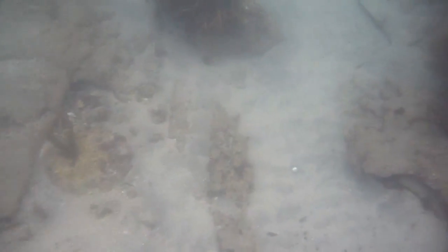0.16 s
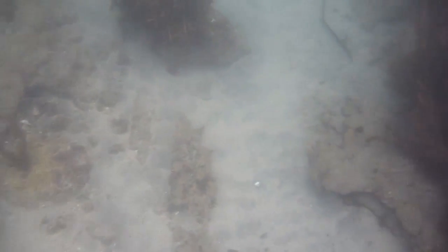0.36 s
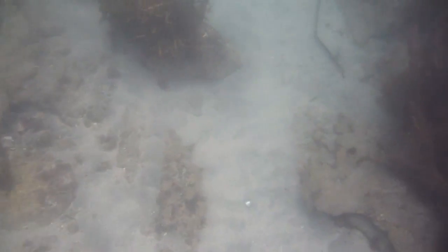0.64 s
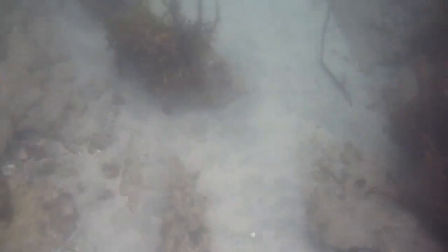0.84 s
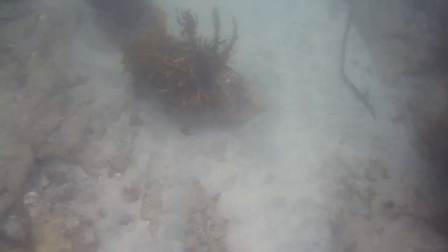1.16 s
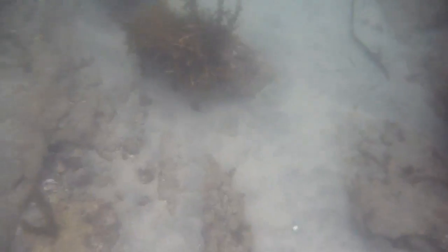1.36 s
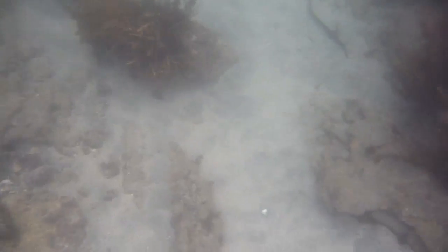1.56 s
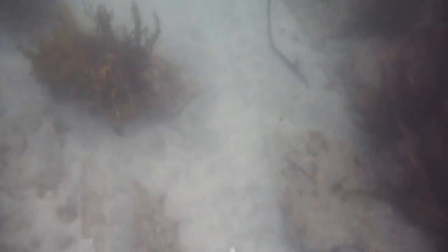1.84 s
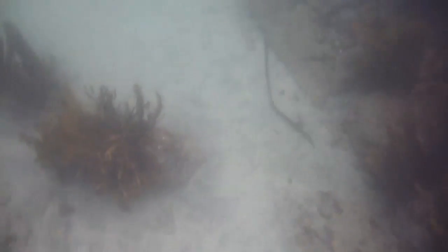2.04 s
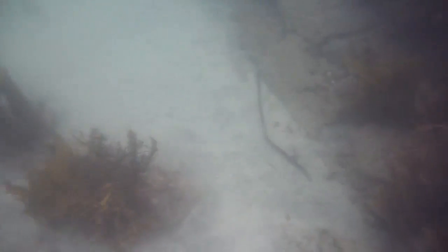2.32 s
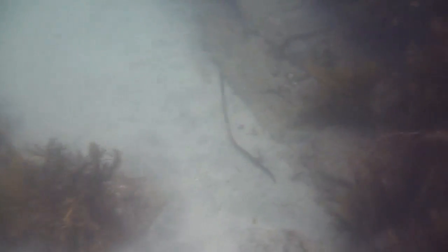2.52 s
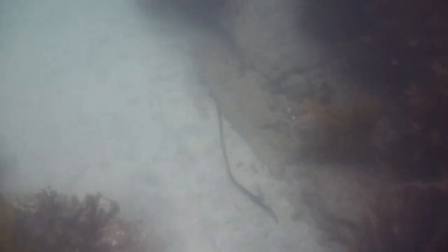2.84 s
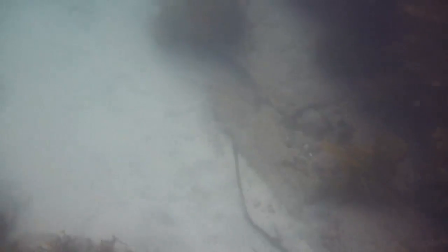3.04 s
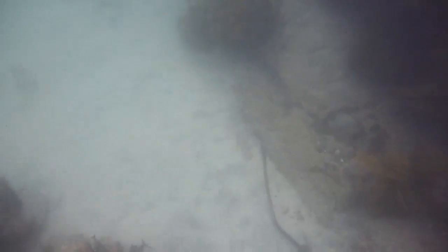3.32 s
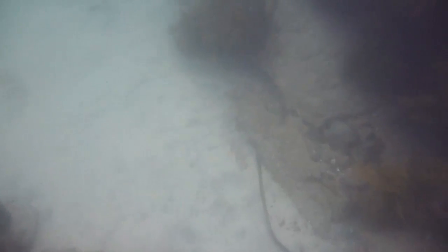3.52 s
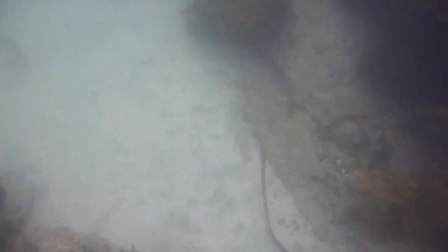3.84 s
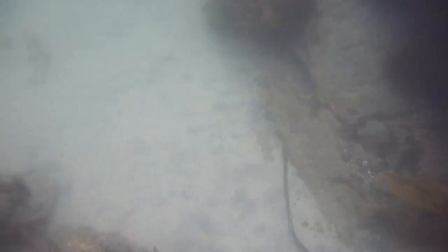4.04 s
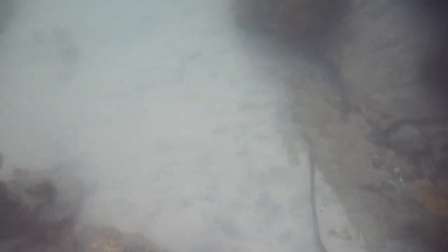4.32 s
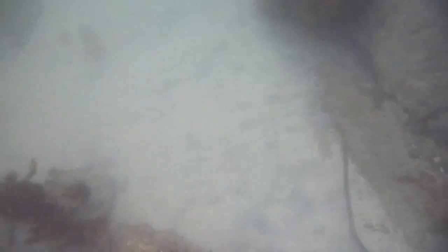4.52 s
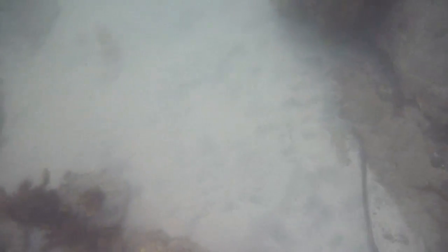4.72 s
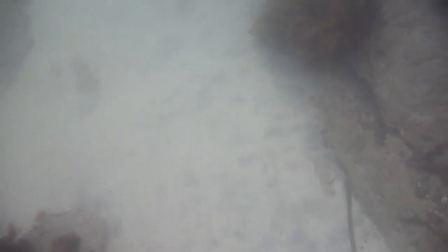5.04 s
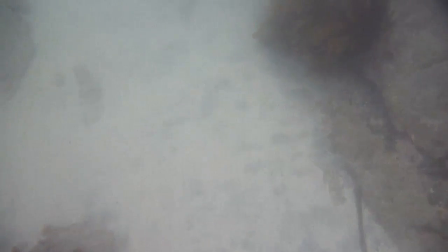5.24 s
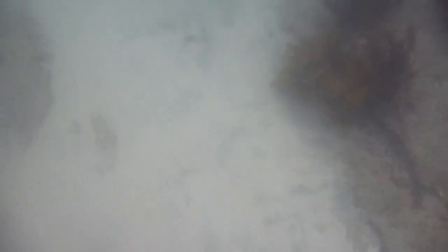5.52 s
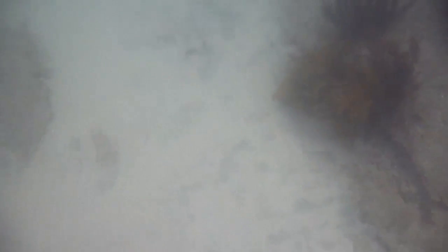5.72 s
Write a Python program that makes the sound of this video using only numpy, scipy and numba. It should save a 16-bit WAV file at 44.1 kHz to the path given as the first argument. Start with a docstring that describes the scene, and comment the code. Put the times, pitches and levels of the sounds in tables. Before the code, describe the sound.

Boxy, close underwater sound with little deep bass. Surf overhead pushes bubbles along in hollow mid-low blubs, over a restless soft rush. Shrimp snap all the time, some sharp and near, most a faint distant sizzle. One strong bloop comes at 1.6 seconds, a cluster of gurgles follows, then a short scrape on the case around 2.5. Later the bubbling continues in small plops with busier, harder clicks to the end.

```python
"""A shallow reef, heard by a camera in a sealed case.
Surf overhead drives bubbles: banded noise for the rush, gliding sine pairs for the gurgles.
Shrimp snap near (impulses ringing the case) and far (hiss and crackle); a knock and a scrape, filtered
sine and noise, sound on the case. Notches and wandering peaks of wall and air pocket colour all of these.
The electronics whine in bursts of steady sines, uncoloured by the case."""
import sys
import numpy as np
from scipy import signal
from scipy.io import wavfile
from scipy.ndimage import uniform_filter1d
from numba import njit

SR = 44100
rng = np.random.default_rng(int(sys.argv[2]) if len(sys.argv) > 2 else 0)


def int16_out(signal):
    """Quantize to a 16-bit WAV file."""
    q = np.round(np.clip(np.atleast_2d(signal).T, -1, 1) * 32767)
    wavfile.write(sys.argv[1], SR, q.astype(np.int16))


N = 259308
T = np.arange(N) / SR


def undb(db):
    """Amplitude ratio of a level in dB."""
    return 10 ** (np.asarray(db) / 20)


def level(x, db):
    """Scale x to an rms of db."""
    return x * undb(db) / np.sqrt(np.mean(x ** 2))


@njit
def svf(x, centre_hz, width_hz):
    """State-variable band-pass with a moving centre, gain 1 there."""
    y, band_state, low_state = np.empty(len(x)), 0., 0.
    for i in range(len(x)):
        g = np.tan(np.pi * centre_hz[i] / SR)
        k = width_hz / centre_hz[i]
        v = (band_state + g * (x[i] + 1e-18 - low_state)) / (1 + g * (g + k))
        band_state = 2 * v - band_state
        low_state += 2 * g * v
        y[i] = k * v
    return y


def band(x, hz, width_hz, passes=1):
    """Fixed second-order band-pass, gain 1 at the centre, run once or more."""
    b, a = signal.iirpeak(hz, hz / width_hz, SR)
    for _ in range(passes):
        x = signal.lfilter(b, a, x)
    return x


def shape(table, hz):
    """dB of a (Hz, dB) table, linear over log frequency."""
    table_hz, db = np.transpose(table)
    return np.interp(np.log(hz), np.log(table_hz), db)


def walk(rate_hz):
    """Random levels held 1 / rate_hz s and slewed twice; spread near 1."""
    hold = int(SR / rate_hz)
    steps = np.repeat(rng.standard_normal(N // hold + 1), hold)
    return 1.3 * uniform_filter1d(uniform_filter1d(steps, hold), hold)[:N]


def add(out, s, x):
    """Mix x into out from time s."""
    i = int(s * SR)
    out[i:i + len(x)] += x[:N - i]


# Surf overhead. Each row: time in seconds, relative level in dB of the flow rumble, of the big bubbles,
# of the middling bubbles.
SURF_LEVELS = [(0.0, -51, -31.5, -36), (0.18, -54.5, -30.5, -42.5), (0.4, -56, -32, -38.5),
               (0.65, -47.5, -38.5, -41), (0.85, -54, -43.5, -42), (1.08, -56.5, -48.5, -42.5),
               (1.28, -50.5, -35.5, -38.5), (1.55, -62, -24, -41), (1.75, -64, -28.5, -40),
               (1.9, -56.5, -29, -35), (2.15, -51.5, -34.5, -36.5), (2.42, -55, -31, -37.5),
               (2.46, -55, -35.5, -39.5), (2.55, -58, -33.5, -37), (2.66, -69, -36.5, -39),
               (2.8, -53.5, -33, -40), (3.0, -58.5, -35, -40.5), (3.33, -58.5, -38, -40.5),
               (3.45, -51.5, -37.5, -35), (3.7, -54.5, -33.5, -31), (4.1, -60.5, -30.5, -37.5),
               (4.45, -62, -31.5, -32.5), (4.75, -57.5, -29, -42), (4.95, -55.5, -36, -37),
               (5.2, -51.5, -29.5, -32.5), (5.55, -59.5, -33, -39.5), (5.88, -49, -30.5, -43)]
# Other bubble sizes. Each row: time in seconds, relative level in dB of the largest, of the small,
# of the smallest.
SIZE_LEVELS = [(0.02, -44.5, -53, -56), (0.25, -42.5, -46, -54), (0.8, -62.5, -47.5, -60),
               (1.12, -57.5, -45.5, -57.5), (1.51, -49.5, -47.5, -54), (1.79, -61, -48.5, -55),
               (2.22, -48, -47, -49), (2.58, -57, -50.5, -54), (3.0, -50, -49.5, -52.5),
               (3.36, -49.5, -48, -53.5), (3.57, -45.5, -44.5, -47.5), (3.75, -47.5, -43.5, -47),
               (4.09, -44.5, -48.5, -50.5), (4.4, -52.5, -43, -52.5), (5.03, -53, -43.5, -50.5),
               (5.22, -49.5, -45, -48), (5.66, -52.5, -51, -51.5), (5.84, -52.5, -51, -52.5)]


def surf(s):
    """Surf drive at times s: relative dB of the rumble, then of five bubble sizes, largest first."""
    surf_s, *surf_db = np.transpose(SURF_LEVELS)
    size_s, *size_db = np.transpose(SIZE_LEVELS)
    rumble, big, middling = [np.interp(s, surf_s, db) for db in surf_db]
    largest, small, smallest = [np.interp(s, size_s, db) for db in size_db]
    return np.array([rumble, largest, big, middling, small, smallest])


# Pitches of the surf levels: top of the rumble in Hz, then centres in Hz of five bubble sizes, largest first.
SURF_HZ = (260, 340, 480, 760, 960, 1250)
# Ripple about the surf levels. Each row: pitch in Hz, offset in dB.
RIPPLE = [(60, -37), (110, -16.5), (200, -1.5), (270, 3), (320, -3), (390, 5), (450, 1.5), (580, 1.5),
          (640, -4), (780, 6.5), (950, 5), (1100, 5), (1280, 5), (1480, 0.5), (1700, -7.5)]
RUSH_DB = -8  # unresolved rush against the rippled surf level


def rush(flicker_db=2.0, swell_db=2.0, shared_db=1.5, drift_db=1.0):
    """Unresolved bubbles: sixth-octave noise slices, each flickering and swelling alone, throbbing together."""
    levels_db = surf(T) + drift_db * np.array([walk(5.11) for _ in SURF_HZ])
    out, throb = 0, walk(30)
    for hz in 60 * 2 ** np.arange(0, 5, 1 / 6):
        weights = [np.interp(np.log(hz), np.log(SURF_HZ), one) for one in np.eye(len(SURF_HZ))]
        db = weights @ levels_db + shape(RIPPLE, hz)
        db = db + flicker_db * walk(24) + swell_db * walk(9) + shared_db * throb
        noise = band(rng.standard_normal(N), hz, hz / 5, passes=3)
        out = out + undb(db) * level(noise, 0)
    return out * undb(RUSH_DB)


# Far hiss. Each row: frequency in Hz, relative density in dB per Hz.
HISS = [(1500, 5.5), (2000, 5.5), (3000, 0), (4500, -1.5), (6400, -7), (8500, -13.5), (10500, -16.5),
        (12500, -15), (14500, -28)]
# Colours of the far ticks. Each row: centre in Hz, width in Hz, relative level in dB.
CRACKLE_BANDS = [(2200, 1700, -1), (3920, 2400, 4), (6260, 2300, -3.5), (9170, 2200, -2.5),
                 (12200, 3000, -19)]
HISS_DB, CRACKLE_DB = -57.5, -67  # rms before case and microphone


def sea(ticks_per_s=220.0, spread_db=5.5, tail_s=0.0026, drift_db=0.26, flicker_db=2.0):
    """Smooth far hiss plus the crackle of distant shrimp: smeared ticks, each with a colour of its own."""
    hiss = 0
    for hz in 1500 * 2 ** np.arange(0, 3.3, 1 / 3):
        db = shape(HISS, hz) + drift_db * walk(5) + flicker_db * walk(30)
        hiss = hiss + undb(db) * band(rng.standard_normal(N), hz, hz / 3, passes=2)
    chance = rng.random((N, 2 + len(CRACKLE_BANDS))).T
    tick_db = -spread_db * np.log(1 - .95 * chance[1])
    ticks = (chance[0] < ticks_per_s / SR) * undb(tick_db)
    crackle, tail_t = 0, T[:SR // 100]
    for (hz, width_hz, db), share in zip(CRACKLE_BANDS, chance[2:]):
        tail = np.exp(-tail_t / tail_s) * rng.standard_normal(len(tail_t))
        smeared = signal.fftconvolve(ticks * share ** 3, tail)[:N]
        crackle = crackle + level(band(smeared, hz, width_hz, passes=2), db)
    return level(hiss, HISS_DB) + level(crackle, CRACKLE_DB)


# Near shrimp. Each row: start in seconds, peak in dB on the second ring of the case before its trim,
# dB of the low, third, fourth and top ring against it.
SNAP_ROWS = [(0.0075, -34, -10, -9, -26.0, -38), (0.0425, -69, 8.0, -5, 4.0, 2.0),
             (0.061, -66, 1, -6.0, 5, -14.0), (0.083, -54, -8.0, -14.0, 9, -11.0),
             (0.1447, -23, -16, -26, -14, -29.0), (0.148, -29.5, -11, -8, -11, -24),
             (0.173, -40, -2.5, -7, 2, -16.0), (0.179, -38, -16, -16, -18, -28),
             (0.3517, -47, -18, -15.0, 6, -17.0), (0.589, -44, -3.0, -12.0, -12.0, -12.0),
             (0.6146, -41, 2, -11.0, -7, -13.0), (0.6164, -50, 9, -17.0, -7.0, -22.0),
             (0.6448, -49, -10.0, -4.0, -10.0, -24.0), (0.6499, -50.0, -6.0, -9.0, -8.0, -11.0),
             (0.763, -44, -19.0, -7.0, 0, -14.0), (0.8003, -60, -3.0, 3.0, 12, -5.0),
             (0.823, -39, -11, -27.0, -13.0, -31.0), (0.8439, -43, -5, -6.0, -15.0, -20.0),
             (1.021, -54, 0, 0.0, 9, -4.0), (1.0696, -44, -16, -16, -18, -28),
             (1.0845, -55, -11.0, -7.0, -4.0, -4.0), (1.1181, -59, -8.0, -1.0, 0, -3.0),
             (1.1396, -63, 9.0, -8.0, 1, -16.0), (1.26, -65, -1.0, 3.0, 1.0, 2.0),
             (1.2645, -63, 0.0, -12.0, 3, -4.0), (1.3494, -42, -12, -15, -14, -28),
             (1.3824, -28, -25.0, -11, -30, -30.0), (1.481, -50, -17.0, -19.0, -12.0, -13.0),
             (1.5038, -40.5, -14.0, -20.0, -12, -35.0), (1.5741, -42.0, -22.0, -5.0, -2.0, -4),
             (1.5941, -37.5, -3.5, -24.0, -16.0, -23.0), (1.6672, -53, -10, -9.0, -3.0, -6.0),
             (1.6786, -44, -0.5, -9, 2, -18.0), (1.7287, -32.5, -27, -22, -17, -29.0),
             (1.7846, -29, -12, -16, -31, -35.0), (1.8098, -27.5, -5, -9, -31, -38.0),
             (1.8135, -31, -4, -19, -27, -38.0), (1.8752, -60, 14, -7.0, 18.0, -8),
             (1.9524, -39.5, -5, -1, -3, -23.0), (1.9638, -63.0, 0.0, -1.0, 14.0, -9.0),
             (1.9747, -52, -8.0, -12, -2.0, -22.0), (2.0095, -54, -11.0, -9.0, 1.0, -18.0),
             (2.2345, -49, -10.0, -11.0, -7.0, -8.0), (2.283, -45, -13.0, 0, -2, -21.0),
             (2.3093, -42, -14, -17, -14, -28), (2.4121, -47, -14.0, -13.0, -1, -21.0),
             (2.422, -41.5, -5, -7.0, -10.0, -15.0), (2.487, -65, 0.0, -6.0, 9, -3.0),
             (2.6003, -41.5, -11.0, -15.0, 4, -13.0), (2.6647, -53, -1.0, -8.0, 3, -12.0),
             (2.711, -39, -12, -12, -9.0, -13.0), (2.7377, -49.0, -9.0, -6.0, -6.0, -7.0),
             (2.8046, -43.5, -9.0, 3, 4, -10.0), (2.929, -39.5, -18.0, -8, -1.5, -22.0),
             (3.007, -35.5, -24.0, -21.0, -16, -30.0), (3.032, -56.5, -6.0, -2.0, 10, -8.0),
             (3.0814, -59, -1.0, 6.0, 9.0, 4.0), (3.24, -43, -8, -1.0, -4, -7.0),
             (3.2798, -48, -15.0, -9.0, -5.0, -7.0), (3.4153, -57, 7, 3.0, 9, -18),
             (3.5095, -36, -17, -14.0, -23.0, -43.0), (3.5224, -36, -19, -8, -1.5, -29.0),
             (3.8137, -39, -20.0, -13.0, -13.0, -27.0), (3.8212, -52, -10, -4, 12.5, -19.0),
             (3.8304, -51, -16, -10.0, -4.0, -8.0), (3.9698, -50, 9, 3, -7, -7.0),
             (4.026, -23, -10, -21, -12.5, -42.0), (4.0696, -55, 5.0, -8.0, 9, -7.0),
             (4.138, -28.5, -2.5, -25, 1, -23), (4.1647, -37, -17.0, -20.0, -16.0, -40.0),
             (4.1916, -37, -1.5, -2, -5, -17.0), (4.292, -36.5, -10, -9, -19.0, -34.0),
             (4.3137, -54, -4.0, -1.0, -1.0, -3.0), (4.328, -38, -13, -11.0, -17, -17.0),
             (4.3331, -50, -7.0, -12.0, -2.0, -3.0), (4.3522, -44, -12.0, -4.0, -4, -12.0),
             (4.435, -35.5, -8, -15.0, -10, -35.0), (4.503, -35.5, -9.0, -5, -2.5, -13),
             (4.51, -37, -11, -9, -19.0, -27.0), (4.6014, -44, -4.0, -7, -1, -7.0),
             (4.6513, -31, -16.0, -15, 1, 1.5), (4.658, -24, -6.5, -20.0, -17, -36.0),
             (4.6774, -33, -19, -15.0, -3, -16.0), (4.683, -34, -22, -12, -11, -26),
             (4.848, -31.5, -14, -12, -14, -20), (4.8635, -36.5, -5, -25.0, -23.0, -31.0),
             (4.8906, -21.5, -22, -14, -33, -23), (4.9424, -49, 2, -3.0, -6, -5.0),
             (4.9486, -41, -11.0, -2, -12, -19.0), (5.0405, -60, -1.0, -6.0, 13, -11.0),
             (5.0684, -37, 0, -19.0, -23.0, -28), (5.0925, -40.5, -16.0, -4, -15.0, -17.0),
             (5.125, -47.5, 2, 5, 6, -6.0), (5.1521, -54.0, -7.0, -5.0, -2.0, -2.0),
             (5.2206, -39, -22.0, 1, -14, -7), (5.2665, -44, -13, -5.0, -8.0, -22.0),
             (5.3183, -33.5, -21.0, -13.0, -24.0, -31.0), (5.3318, -46, 5, -4.0, -3, -16.0),
             (5.3699, -55.5, -6.0, -13.0, -6.0, -5.0), (5.3813, -62.5, 1.0, -2.0, 7.0, 7.0),
             (5.3922, -51, -6.0, -14.0, -5.0, -5.0), (5.4077, -46, -15.0, -18, -6.0, -8.0),
             (5.4262, -38, -23.0, -19.0, -17.0, -29.0), (5.501, -43, -11, -5, -8, -22),
             (5.5453, -26.5, -9, -21, -14, -30.0), (5.5831, -51.0, -11.0, -6.0, -4.0, -7.0),
             (5.667, -55, -6.0, -11.0, 12, -8.0), (5.7916, -50.5, -14.0, -9.0, -6.0, -8.0),
             (5.8494, -50.5, 6, -2, 7, -17.0)]
# Rings of the case, lowest first. Each row: pitch in Hz, width in Hz of each of two passes, trim in dB.
CASE_RINGS = [(1990, 1570, 5), (3940, 1030, -2), (6520, 3000, 0.5), (9340, 1600, -5), (11500, 2500, 0)]
# Fainter snaps: mean peak in dB on each ring, lowest first, before its trim.
FAINT_DB = (-59, -52.5, -62, -64, -81)
FAINT_COUNT, FAINT_SCATTER_DB = 80, 7.5  # random times; widest scatter from ring to ring
RATTLE_S, RATTLE_LOG_SCATTER = 0.0014, .3  # typical fade
RING_LOG_SCATTER = .035  # pitch spread from snap to snap
THUMP_HZ, THUMP_DB = 1140, 2.5  # under the low ring; dB against its untrimmed peak


def snaps(rattle=0.079, echo=0.028, echo_s=0.0078):
    """A tick, a short noisy rattle and a faint noisy echo off the rocks set off the rings of the case."""
    out, t = np.zeros(N), T[:SR // 25]
    near = [(s, db + low, db, db + third, db + fourth, db + top)
            for s, db, low, third, fourth, top in SNAP_ROWS]
    chance = rng.random((FAINT_COUNT, 1 + len(CASE_RINGS)))
    faint_db = FAINT_DB + FAINT_SCATTER_DB * (2 * chance[:, 1:] - 1)
    rows = np.vstack([np.c_[chance[:, 0] * N / SR, faint_db], near])
    for (s, *ring_peaks_db), noise in zip(rows, rng.standard_normal((len(rows), len(t)))):
        rattle_s = np.clip(RATTLE_S * np.exp(RATTLE_LOG_SCATTER * noise[0]), .0002, .015)
        blow = noise * (rattle * np.exp(-t / rattle_s) + echo * np.exp(-t / echo_s))
        blow[0] = 1  # the tick
        for k, ((hz, width_hz, trim_db), db) in enumerate(zip(CASE_RINGS, ring_peaks_db)):
            hz = hz * np.exp(RING_LOG_SCATTER * noise[-1 - k])
            ring = band(blow, hz, width_hz, passes=2)
            # neighbouring rings swing in opposite sense, so the crack stays even between them
            add(out, s, (-1) ** k * undb(db + trim_db) * ring / np.abs(ring).max())
        thump = band(blow, THUMP_HZ, THUMP_HZ, passes=2)
        add(out, s, -undb(ring_peaks_db[0] + THUMP_DB) * thump / np.abs(thump).max())
    return out


SWARM_COUNT, SWARM_LOW_HZ, SWARM_HIGH_HZ = 800, 340, 1400
SWARM_DB, SWARM_SPREAD_DB = 0.2, 2  # against the rippled surf level at their pitch
SWARM_CYCLES, SWARM_LOG_SPREAD = 3.4, 0.47  # typical length


def swarm():
    """Bubble rows of lesser bubbles at random times, following the surf level at their size and moment."""
    when, size = rng.random((SWARM_COUNT, 2)).T
    loud, long = rng.standard_normal((SWARM_COUNT, 2)).T
    s = .03 + when * (N / SR - .03)
    hz = SWARM_LOW_HZ * (SWARM_HIGH_HZ / SWARM_LOW_HZ) ** size
    surf_db = [np.interp(np.log(f), np.log(SURF_HZ), column) for f, column in zip(hz, surf(s).T)]
    db = SWARM_DB + SWARM_SPREAD_DB * loud + shape(RIPPLE, hz) + surf_db
    length_s = SWARM_CYCLES / hz * np.exp(SWARM_LOG_SPREAD * long)
    return list(zip(s, db, hz, length_s))


FLECK_COUNT, FLECK_LOW_HZ, FLECK_HIGH_HZ = 90, 1700, 2400
FLECK_DB, FLECK_SPREAD_DB, FLECK_S = -56.5, 3, 0.0033


def flecks():
    """Bubble rows of tiny high bubbles at random times; the lower ones are the more common."""
    when, size = rng.random((FLECK_COUNT, 2)).T
    db = FLECK_DB + FLECK_SPREAD_DB * rng.standard_normal(FLECK_COUNT)
    s = .03 + when * (N / SR - .03)
    hz = FLECK_LOW_HZ * (FLECK_HIGH_HZ / FLECK_LOW_HZ) ** (size ** 2)
    return [(*row, FLECK_S) for row in zip(s, db, hz)]


# Single bubbles at set times, loud gurgles to faint high blips, plus two short low bodies of snaps.
# Each row: middle in seconds, peak in dB before twin and wobble, pitch in Hz at the middle,
# length at half height in seconds.
BUBBLES = [(0.048, -27.5, 573, 0.018), (0.116, -24.5, 500, 0.016), (0.157, -22.5, 533, 0.0065),
           (0.448, -21, 530, 0.0061), (0.694, -29, 565, 0.009), (0.146, -34, 1250, 0.003),
           (0.198, -28, 502, 0.017), (0.249, -24.5, 954, 0.0092), (0.437, -22.5, 584, 0.0087),
           (0.411, -28, 520, 0.018), (0.552, -30, 860, 0.011), (0.635, -29.5, 764, 0.009),
           (0.724, -23.5, 578, 0.019), (1.015, -38, 226, 0.0094), (1.143, -46, 1840, 0.004),
           (1.296, -27.5, 615, 0.01), (1.42, -24.5, 446, 0.02), (1.468, -23, 450, 0.032),
           (1.471, -22, 755, 0.025), (1.532, -21, 463, 0.022), (1.572, -27, 550, 0.011),
           (1.626, -13.5, 523, 0.0057), (1.674, -26, 548, 0.01), (1.836, -18, 552, 0.014),
           (1.863, -15, 581, 0.025), (1.946, -23.5, 565, 0.042), (1.937, -28, 797, 0.02),
           (2.029, -20.5, 548, 0.015), (2.035, -30.5, 775, 0.03), (2.088, -27.5, 773, 0.024),
           (2.137, -23, 572, 0.0077), (2.15, -57, 2040, 0.0089), (2.192, -24.5, 430, 0.01),
           (2.154, -29, 834, 0.008), (2.173, -25, 800, 0.0089), (2.284, -33, 726, 0.01),
           (2.3, -48, 2090, 0.006), (2.332, -49, 2600, 0.004), (2.322, -16, 512, 0.01),
           (2.346, -21.5, 544, 0.0099), (2.345, -26, 810, 0.0077), (2.365, -31, 764, 0.0081),
           (2.399, -24.5, 544, 0.028), (2.428, -21.5, 740, 0.0033), (2.515, -25, 525, 0.013),
           (2.658, -25, 727, 0.011), (2.756, -22.5, 740, 0.0064), (2.907, -27, 689, 0.01),
           (3.008, -28, 564, 0.018), (3.197, -27.5, 750, 0.01), (3.208, -26, 596, 0.027),
           (3.25, -25, 955, 0.012), (3.252, -47, 1790, 0.009), (3.292, -28.5, 681, 0.022),
           (3.555, -27, 432, 0.021), (3.617, -33, 1104, 0.015), (3.633, -34, 1210, 0.012),
           (3.695, -20, 463, 0.0067), (3.725, -22.5, 398, 0.0087), (3.725, -46, 1810, 0.0088),
           (3.665, -26.5, 794, 0.008), (3.7, -18.5, 710, 0.0042), (3.826, -20.5, 450, 0.019),
           (3.787, -27, 444, 0.013), (3.974, -24, 420, 0.011), (3.848, -33, 1044, 0.014),
           (3.89, -19, 780, 0.0064), (3.916, -27, 452, 0.009), (3.92, -25, 743, 0.006),
           (4.016, -26.5, 495, 0.014), (4.023, -18, 773, 0.0093), (4.104, -23.5, 800, 0.007),
           (4.139, -30, 1350, 0.0025), (4.142, -24.5, 375.4, 0.04), (4.349, -25, 437, 0.037),
           (4.291, -28, 463, 0.014), (4.323, -46, 1770, 0.006), (4.376, -28, 607, 0.011),
           (4.376, -26.5, 777, 0.015), (4.399, -27, 455, 0.014), (4.445, -25, 736, 0.0074),
           (4.451, -25, 452, 0.019), (4.462, -27, 574, 0.022), (4.476, -27, 723, 0.051),
           (4.477, -37, 252, 0.0077), (4.528, -22, 829, 0.014), (4.55, -22, 725, 0.014),
           (4.586, -22.5, 460, 0.009), (4.613, -26, 423, 0.034), (4.662, -24, 800, 0.0094),
           (4.637, -27, 840, 0.0091), (4.667, -30, 490, 0.01), (4.75, -29, 474, 0.018),
           (4.773, -23.5, 440, 0.0082), (4.784, -48, 1870, 0.006), (4.942, -27, 580, 0.011),
           (4.944, -29, 1090, 0.0062), (4.999, -27, 426, 0.025), (5.007, -46, 1830, 0.006),
           (5.024, -49, 1870, 0.005), (5.039, -24.5, 430, 0.005), (5.131, -25.5, 728, 0.02),
           (5.161, -25.5, 463, 0.007), (5.075, -27.5, 790, 0.0086), (5.148, -24, 773, 0.0074),
           (5.203, -27, 700, 0.0087), (5.229, -24.5, 710, 0.013), (5.264, -26, 474, 0.0061),
           (5.237, -28, 463, 0.015), (5.244, -46, 1780, 0.005), (5.263, -26.5, 743, 0.013),
           (5.29, -36, 277, 0.016), (5.3, -24.5, 517, 0.01), (5.336, -22, 580, 0.0068),
           (5.359, -17, 678, 0.02), (5.497, -27.5, 506, 0.011), (5.598, -26, 580, 0.01),
           (5.613, -50, 1860, 0.01), (5.659, -27.5, 460, 0.0078), (5.702, -29.5, 710, 0.013),
           (5.766, -32.5, 640, 0.012)]


def gurgles(rise=0.36, fall=0.49, glide_per_s=0.3, twin_db=-10, twin_detune=0.13, rough=0.13):
    """Each bubble swells fast, dies slower, creeps up in pitch and beats with a weaker twin; water shakes all."""
    out, lead_s = np.zeros(N), .03
    t = T[:SR // 10] - lead_s
    rows = swarm() + flecks() + BUBBLES
    wobble = 1 + rough * walk(220)
    for (s, db, hz, length_s), (turn, twin_turn, off) in zip(rows, rng.random((len(rows), 3))):
        swell = np.exp(-.5 * (t / (length_s * np.where(t < 0, rise, fall))) ** 2)
        cycles = hz * t * (1 + glide_per_s * t)
        twin_cycles = cycles * (1 + twin_detune * (2 * off - 1)) + turn + .5 * twin_turn - .25
        twin = undb(twin_db) * np.sin(2 * np.pi * twin_cycles)
        add(out, s - lead_s, undb(db) * swell * (np.sin(2 * np.pi * (cycles + turn)) + twin))
    return out * wobble


# Bursts. Each row: start in seconds, end in seconds.
WHINE_BURSTS = [(.395, .67), (2.965, 3.085), (3.49, 3.85), (5.58, 5.9)]
# Partials. Each row: multiple of the clock, rms level in dB before the microphone.
WHINE_PARTIALS = [(26, -72), (27, -70), (28, -86), (29, -85), (30, -92), (31, -91), (39, -92)]
CLOCK_HZ = 362.8


def whine():
    """High multiples of an electronic clock leak in while the camera is busy."""
    gate = sum(1. * (T > start) * (T < end) for start, end in WHINE_BURSTS)
    tone = sum(np.sqrt(2) * undb(db) * np.sin(2 * np.pi * k * CLOCK_HZ * T) for k, db in WHINE_PARTIALS)
    return uniform_filter1d(gate, size=200) * tone


KNOCK_S, KNOCK_HZ, KNOCK_FADE_S = 1.78, 430, .0012
KNOCK_DRIVE_DB = -25  # doubled in amplitude before the fade


def knock():
    """One dull bump on the case: a fast-fading sine, hardly more than a cycle."""
    out, t = np.zeros(N), T[:SR // 20]
    bump = np.exp(-t / KNOCK_FADE_S) * np.sin(2 * np.pi * KNOCK_HZ * t)
    add(out, KNOCK_S, 2 * undb(KNOCK_DRIVE_DB) * bump)
    return band(out, KNOCK_HZ, 2 * KNOCK_HZ, passes=2)  # the stiff wall passes no deep bass


SCRAPE_S, SCRAPE_DB, SCRAPE_HZ = 2.459, -42.5, 4410  # squeak at its loudest
SCRAPE_RISE_DB_S, SCRAPE_FALL_DB_S = 650, 600
SCRAPE_SAG_HZ_DB = 25  # pitch sinks with the level
SCRAPE_LEAD_S, SCRAPE_LEAD_DB = 2.415, -15  # a faint rub first, against the loudest


def scrape(grit_db=-17, body_db=-13, grain_db=0.5):
    """Something rubs briefly along the case: a grainy squeak, a duller undertone and a little high grit."""
    slope_db_s = np.where(T < SCRAPE_S, SCRAPE_RISE_DB_S, -SCRAPE_FALL_DB_S)
    under_db = slope_db_s * (SCRAPE_S - T)
    leading = (T > SCRAPE_LEAD_S) & (T < SCRAPE_S)
    under_db = np.where(leading, np.minimum(under_db, -SCRAPE_LEAD_DB), under_db)
    pitch_hz = SCRAPE_HZ - SCRAPE_SAG_HZ_DB * np.clip(under_db, 0, 30)
    squeak = level(svf(svf(rng.standard_normal(N), pitch_hz, 800.), pitch_hz, 800.), 0)
    body = level(band(band(rng.standard_normal(N), 2400.0, 900.), 2500.0, 900.), body_db)
    grit = level(band(rng.standard_normal(N), 9500.0, 4500., passes=2), grit_db)
    return (squeak + body + grit) * undb(SCRAPE_DB - under_db + grain_db * walk(400))


# Dips and peaks of the case. Each row: centre in Hz, width in Hz, gain in dB.
CASE_COLOUR = [(1590, 400, -37), (3790, 250, 6.5), (7830, 1080, -27), (9390, 790, 9)]
POCKET_DRIFT = .018  # relative pitch wander of the air pocket as the case sways


def case(x):
    """Dips where paths through wall and air pocket cancel, wandering peaks where the pocket resonates."""
    sway = 1 + POCKET_DRIFT * walk(12)
    for hz, width_hz, db in CASE_COLOUR:
        centre_hz = hz * (sway if db > 0 else np.ones(N))
        x = x + (undb(db) - 1) * svf(x, centre_hz, 1. * width_hz)
    return x


def scene():
    """Water sounds through the case, plus the whine past it; one channel."""
    water = rush() + sea() + snaps() + gurgles() + knock() + scrape()
    return (case(water) + whine())[None]


BASS_HZ, TREBLE_HZ, TOP_HZ = 82, 13200, 14300


def record(dry):
    """The microphone loses the deep bass and fades in the top octave; the recorder cuts what is left above."""
    bass_loss = signal.butter(3, BASS_HZ, "high", fs=SR, output="sos")
    treble_loss = signal.butter(3, TREBLE_HZ, fs=SR, output="sos")
    top_cut = signal.ellip(8, .2, 70, TOP_HZ, fs=SR, output="sos")
    return signal.sosfilt(np.vstack([bass_loss, treble_loss, top_cut]), dry)


dry = scene()
out = record(dry)
int16_out(out)
```